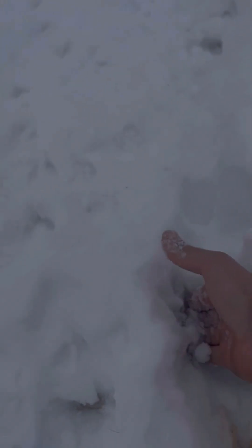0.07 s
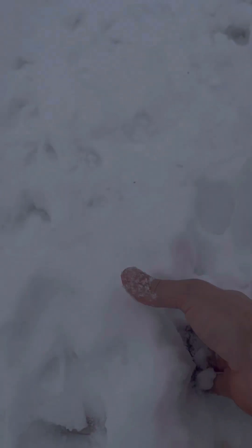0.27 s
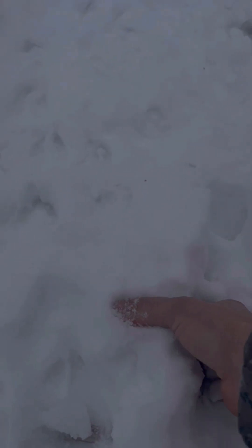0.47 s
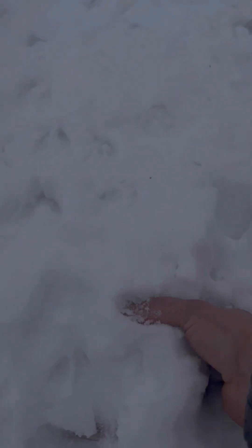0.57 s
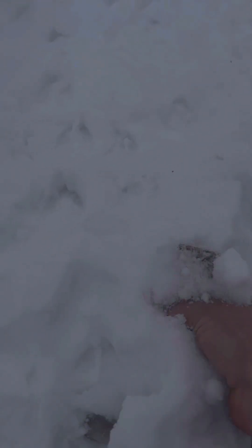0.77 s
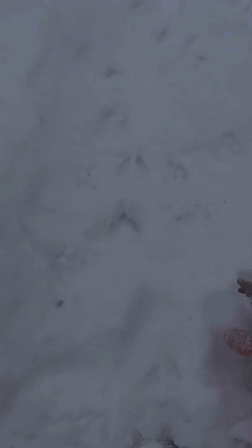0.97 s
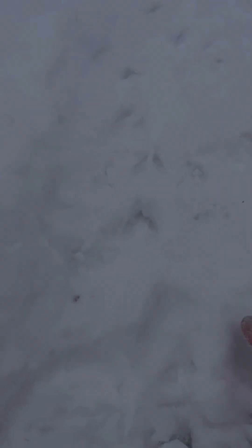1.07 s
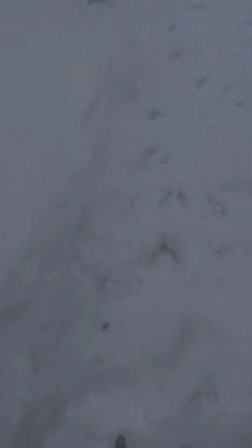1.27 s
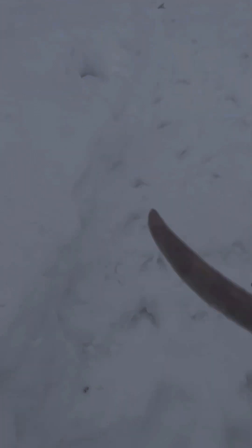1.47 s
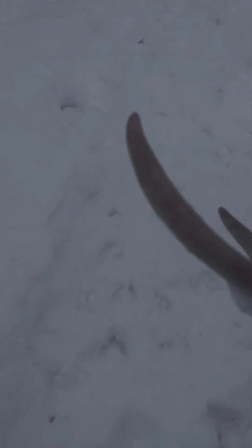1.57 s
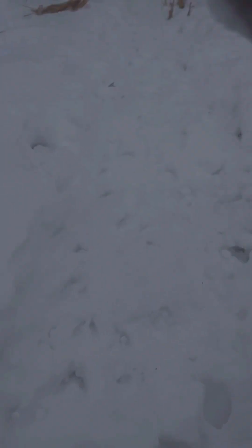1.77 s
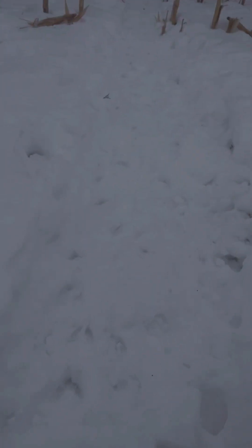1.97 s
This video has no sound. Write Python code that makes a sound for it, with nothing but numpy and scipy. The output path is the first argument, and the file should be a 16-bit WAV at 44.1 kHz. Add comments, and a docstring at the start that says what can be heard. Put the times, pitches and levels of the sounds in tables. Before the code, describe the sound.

A bare hand crunches and scrapes through dry snow, close up, outdoors without echo. Uneven strokes with dull thuds and small crust snaps start immediately, the sharpest crunch coming at about 0.65 seconds. A longer, slightly hollow scrape runs from 1.0 to 1.25 seconds, followed by softer thumps and light scratching that fades by 1.8. At about 1.9 seconds the freed antler gives a brief clicking rattle.

```python
"""Digging an antler out of dry snow

A bare hand digs close to the microphone, in open air with no echo. Brittle fracture of many crystals
makes the crush and scrape of each stroke; packed snow gives way in dull thuds of falling pitch, and
crust snaps. At the end the freed antler chatters, its modes ringing briefly after each contact."""
import sys
import numpy as np
from scipy import signal
from scipy.fft import rfft, irfft, next_fast_len
from scipy.io import wavfile
from scipy.ndimage import map_coordinates

SR = 44100
rng = np.random.default_rng(int(sys.argv[2]) if len(sys.argv) > 2 else 0)


def transcribe(signal):
    """Save signal, clipped to [-1, 1], as a 16-bit WAV file at the path in sys.argv[1]."""
    frames = np.atleast_2d(signal).T
    limited = np.clip(frames, -1, 1)
    pcm = np.round(limited * 32767).astype(np.int16)
    wavfile.write(sys.argv[1], SR, pcm)


N = 89214
T = np.arange(N) / SR


def amp(db):
    return 10 ** (np.asarray(db) / 20)


def unit(x):
    return x / np.sqrt(np.mean(x ** 2) + 1e-20)


def along(points, hz):
    """Interpolation of (frequency, value) points on a logarithmic frequency axis."""
    f, v = np.transpose(points)
    return np.interp(np.log(hz + 1), np.log(f + 1), v)


def curves(rows):
    """Linear interpolation in time: one value per sample for each later column."""
    times, *columns = np.transpose(rows)
    return [np.interp(T, times, column) for column in columns]


def filtered(x, response):
    """Linear filtering: the spectrum of x times a complex frequency response."""
    m = next_fast_len(N + SR // 2)
    return irfft(rfft(x, m) * response(np.fft.rfftfreq(m, 1 / SR)), m)[..., :N]


def shaped(x, points):
    """Spectral shaping by (frequency [Hz], level [dB]) points, to unit rms."""
    return unit(filtered(x, lambda hz: amp(along(points, hz))))


def resonances(modes):
    """Modal superposition: the response of damped resonators of alternating sign."""
    return lambda f: sum((-1) ** k * amp(db) * 1j * f * width / (f0 * f0 - f * f + 1j * f * width)
                         for k, (f0, width, db) in enumerate(modes))


def burst(start, rise, length, t60):
    """Exponential decay after a linear rise and a hold; times in seconds."""
    age = T - start
    return np.clip(age / rise, 0, 1) * amp(-60 * np.clip(age - length, 0, None) / t60)


def clicks(per_s, spread_db):
    """A Poisson process: independent one-sample breaks of random sign and size."""
    chance, sign, size = rng.random(N), rng.standard_normal(N), rng.standard_normal(N)
    return unit(np.sign(sign) * amp(spread_db * np.clip(size, -2, 2)) * (chance < per_s / SR))


def grains(per_s=5000, spread_db=2.5, scrape_share=0.66, clump_db=1.5, clumps_per_s=350):
    """Brittle fracture: two uncorrelated streams of crystals breaking in clumps, over a smooth scrape."""
    breaks = np.array([clicks(per_s, spread_db), clicks(per_s, spread_db)])
    knots = rng.standard_normal(int(N * clumps_per_s / SR) + 4)
    clumps = amp(clump_db * np.clip(map_coordinates(knots, [T * clumps_per_s]), -2, 2))
    scrape = rng.standard_normal((2, N))
    return (np.sqrt(1 - scrape_share) * breaks + np.sqrt(scrape_share) * scrape) * clumps


# Spectrum of the outdoor hush: (frequency [Hz], level [dB])
AIR_SPECTRUM = [(24, -54), (40, -8), (1330, -22.5), (1710, -9), (1990, -17), (9010, -27), (9710, -34),
                (14900, -14), (16500, -33)]
def air(level_db=-62.5):
    """Stationary coloured noise: the faint hush of open air."""
    return amp(level_db) * shaped(rng.standard_normal((2, N)), AIR_SPECTRUM)


def thud(rise, start_hz, end_hz=65, fall_s=0.0079):
    """A damped downward chirp: a soft push whose pitch sinks as it travels through the pack."""
    t = np.arange(SR // 8) / SR
    cycles = end_hz * t + (start_hz - end_hz) * fall_s * (1 - np.exp(-t / fall_s))
    return t / rise * np.exp(1 - t / rise) * np.sin(2 * np.pi * cycles)


# Single collapses: (time [s], peak [dB], rise [s], starting pitch [Hz], after-swing re peak [dB])
THUDS = [(.004, -20.5, 0.0035, 280, -35), (.204, -29, 0.0028, 353, -6.5), (.311, -30, 0.0044, 308, -16),
         (.366, -21, 0.0042, 312, -21), (.523, -19.5, .007, 370, -25), (.6575, -22, 0.0027, 616, -16),
         (.663, -26, 0.0066, 189, -5), (.847, -27.5, 0.0041, 230, -22), (.865, -27, 0.0045, 298, -27),
         (.885, -30, 0.0051, 275, -7), (.903, -35.5, .005, 208, 2), (1.025, -32.5, 0.0031, 328, 1.5),
         (1.107, -35, 0.0065, 222, -7), (1.251, -41.5, .003, 328, -8), (1.274, -33, 0.0038, 294, 6),
         (1.291, -32.5, 0.013, 168, -1), (1.357, -42.5, 0.003, 312, 4), (1.377, -38, 0.0019, 285, -18),
         (1.395, -34.5, 0.0029, 319, -3), (1.451, -42.5, 0.0044, 304, -11), (1.5, -39.5, 0.0036, 320, -4),
         (1.529, -43, 0.0027, 323, -8), (1.557, -42.5, 0.0045, 320, -14), (1.598, -32.5, .005, 313, -6),
         (1.779, -51, 0.0039, 424, 5.5)]
# Settling of the pack: (time [s], rub level [dB], rumble level [dB])
SETTLING = [(0, -34, -29), (.09, -39.5, -39.5), (.135, -39.5, -44), (.15, -53, -60), (.2, -44.5, -56),
            (.215, -41, -58), (.3, -38, -48), (.34, -44, -47), (.45, -40, -39), (.51, -41.5, -44),
            (.56, -46.5, -41), (.63, -49, -49), (.652, -66, -52), (.68, -38.5, -42), (.76, -45.5, -37.5),
            (.8, -47.5, -60), (.85, -41.5, -48), (.91, -45, -38), (.94, -71, -57), (1.01, -66, -53.5),
            (1.05, -48.5, -44), (1.1, -55.5, -59), (1.22, -56.5, -58), (1.27, -57, -49), (1.3, -44, -35),
            (1.4, -45.5, -44.5), (1.45, -60.5, -53.5), (1.58, -57, -61), (1.64, -54, -49), (1.67, -66, -77),
            (1.77, -74, -69), (1.83, -75, -68), (1.92, -86, -76), (1.94, -59, -65), (1.98, -62, -60),
            (2.02, -67, -55)]
# Spectrum of the rumble: (frequency [Hz], level [dB])
RUMBLE_SPECTRUM = [(20, 0), (40, 11), (65, 9), (100, 17), (150, -35)]
def packed_snow(swing_hz=60.2, swing_s=0.014):
    """Yielding under load: thuds with a damped after-swing, over a rub of small thuds and a rumble."""
    thuds, t = np.zeros(N + SR), np.arange(SR // 8) / SR
    swing = (t / swing_s) ** 2 * np.exp(2 - 2 * t / swing_s) * np.sin(2 * np.pi * swing_hz * t)
    for start, db, rise, hz, swing_db in THUDS:
        thuds[round(start * SR):][:len(t)] += amp(db) * (thud(rise, hz) - amp(swing_db) * swing)
    rub = signal.fftconvolve(clicks(per_s=300, spread_db=3), thud(rise=0.0038, start_hz=351))[:N]
    rumble = shaped(rng.standard_normal(N), RUMBLE_SPECTRUM)
    rub_db, rumble_db = curves(SETTLING)
    return thuds[:N] + amp(rub_db) * unit(rub) + amp(rumble_db) * rumble


# Modes of the antler: (frequency [Hz], bandwidth [Hz], level [dB])
ANTLER_MODES = [(1580, 42, -4), (2370, 49, -6), (2876, 61, -5), (4480, 98, -7), (5750, 126, -1),
                (8010, 170, -6)]
# Contacts: (time [s], length [s], level [dB], ringing share [0-1], favoured frequency [Hz])
CONTACTS = [(1.9319, 0.0093, -33, 0.53, 3320), (1.943, 0.0045, -29.5, 0.98, 5700),
            (1.95, .022, -45, 0.44, 2300), (1.958, 0.0057, -42.5, 0.55, 5700),
            (1.976, 0.0065, -47, 0, 4500), (1.98, 0.0059, -36, 0.07, 6000),
            (1.987, 0.0048, -36, 0.13, 6000), (1.992, .005, -36.5, 0.8, 4500),
            (1.9983, 0.028, -39.5, 0.07, 2600)]
# Spectrum of the contact hiss: (frequency [Hz], level [dB])
HISS_SPECTRUM = [(400, -24), (700, -13.5), (3000, -13.5), (6000, -4.5), (8500, -5.5), (10300, -11.5),
                 (14400, -0.5), (15600, -10), (16300, -40)]
def antler(favour_db_per_octave=13.5):
    """Modal excitation: contacts hiss and ring, each spot touched favouring the modes near one pitch."""
    hiss, drive, out = shaped(grains(), HISS_SPECTRUM), grains(), 0
    for start, length, db, share, favoured_hz in CONTACTS:
        modes = resonances([(hz, width, mode_db - favour_db_per_octave * abs(np.log2(hz / favoured_hz)))
                            for hz, width, mode_db in ANTLER_MODES])
        rms_gain = np.sqrt(np.mean(abs(modes(np.linspace(0, SR / 2, 4096))) ** 2))
        envelope = amp(db) * burst(start, rise=0.0014, length=length, t60=0.017)
        ring = filtered(drive * envelope, modes) / rms_gain
        out = out + np.sqrt(share) * ring + np.sqrt(1 - share) * hiss * envelope
    return out


# Breaks in the crust: (time [s], level [dB], 60 dB decay time [s], treble tilt [dB/octave])
SNAPS = [(0.5226, -32.5, 0.046, -2), (0.583, -39.5, 0.027, 1), (0.6548, -25, 0.02, -1.5),
         (1.041, -41.5, 0.022, -3), (1.6048, -42.5, 0.016, 0.5), (1.9116, -50, 0.0066, 2.5)]
# Spectrum of a snap: (frequency [Hz], level [dB])
SNAP_SPECTRUM = [(350, -17), (600, -8), (1800, -3), (4520, -14), (7940, -10.5), (10500, -23.5),
                 (14500, -3.5), (16000, -35)]
def crust():
    """Fracture transients: sudden sprays of grains that die fast, some duller than others."""
    spray, out = shaped(grains(), SNAP_SPECTRUM), 0
    for start, db, t60, tilt_db in SNAPS:
        tilted = filtered(spray, lambda hz: amp(tilt_db * np.log2(hz / 2000 + 0.25)))
        out = out + amp(db) * burst(start, rise=0.00041, length=0.0024, t60=t60) * tilted
    return out


# Hand strokes: (time [s], fizz level [dB], then re fizz: hollow [dB], low crunch [dB], top treble [dB])
STROKES = [(0, -39.5, -7, 4, -3.5), (.036, -39.5, 0.5, -4.5, -7), (.132, -50, 0, 1, -3.5),
           (.146, -67, 1, 0.5, -2), (.236, -53.5, -3.5, -2.5, -8), (.31, -42, -4, -1, -5),
           (.412, -42, 2, -4.5, -1), (.45, -43.5, 0.5, -3, -3), (.484, -50.5, 0, 0, -1),
           (.492, -38, -2, -4, -0.5), (.532, -40, -7, 3, -8), (.548, -47.5, 0.5, 3, -1.5),
           (.6535, -49.5, -2.5, -3.5, -3), (.6555, -26, 2, -21, -3), (.664, -26.5, -5, -10, -3.5),
           (.676, -32.5, -3.5, -1, -3), (.714, -32, -6, -11.5, -4), (.832, -44.5, 1, -7.5, -5.5),
           (.88, -47, -11.5, -10.5, 2.5), (.978, -53, -11.5, -15.5, 0), (1.037, -52.5, -5.5, 3, 1),
           (1.044, -43, 0, -18, -7), (1.106, -37, -4.5, -9.5, -10), (1.145, -36.5, -6.5, -17, -8),
           (1.185, -32.5, -6, -24, -12), (1.238, -32, -4, -25, -12), (1.26, -51, -5, -10.5, -4),
           (1.338, -44.5, -16, -4.5, -1), (1.37, -51.5, -9, -17, -3), (1.404, -52, -15, -16, 0),
           (1.409, -40, -30, -28, -0.5), (1.424, -43, -22, -27, 0), (1.45, -52.5, -12, -16.5, 0.5),
           (1.52, -60.5, -5, -8, 2), (1.654, -57, -7, -8.5, -5.5), (1.685, -57.5, -14, -14, 1),
           (1.693, -47.5, -15, -17, -2), (1.735, -47.5, -18, -32, -5), (1.755, -64.5, -10, -36, -2),
           (1.778, -59.5, -12, -2, 3), (1.794, -49, -17, -19, -11), (1.808, -69, -2, -5, 3),
           (1.908, -60.5, -7, -20, -1), (1.93, -71, -5, -14, -14)]
# Spectra of the three bands of crushing: (frequency [Hz], level [dB])
FIZZ_SPECTRUM = [(1530, -37.5), (2600, -7), (3210, -4), (3910, -2), (4450, -5), (5990, 0), (7980, -2),
                 (10500, -18), (13600, -33), (22000, -120)]
LOW_SPECTRUM = [(300, -11.5), (450, 5), (650, -0.5), (900, -4), (1250, -3), (1700, -34)]
TOP_SPECTRUM = [(6180, -33), (10500, -13), (11800, 0.5), (13700, 1.5), (15000, 0.5), (16000, -8),
                (16500, -45)]
# Modes of the hollow under the hand and of a cavity: (frequency [Hz], bandwidth [Hz], level [dB])
HOLLOW_MODES = [(1772, 720, 41), (2500, 500, -4)]
CAVITY_MODES = [(1706, 400, -3), (2015, 200, -1), (2400, 92, -7)]
# Ring of the cavity that one long stroke opens: (time [s], level re fizz [dB])
CAVITY_RING = [(1.04, -32), (1.06, -5), (1.12, -4), (1.19, -2.5), (1.235, -12), (1.255, -30)]
def hand_strokes():
    """Source and filter: the same crushed grains sound in three bands, a hollow and a cavity."""
    level_db, hollow_db, low_db, top_db = curves(STROKES)
    cavity_db, = curves(CAVITY_RING)
    crush = grains() * (T < STROKES[-1][0])
    fizz = shaped(crush, FIZZ_SPECTRUM)
    top = amp(top_db) * shaped(crush, TOP_SPECTRUM)
    low = amp(low_db) * shaped(crush, LOW_SPECTRUM)
    hollow_ring = filtered(crush, resonances(HOLLOW_MODES))
    hollow = amp(hollow_db) * shaped(hollow_ring, [(900, 7), (1400, -1.5), (2600, 1), (4000, 2)])
    cavity_ring = filtered(crush, lambda hz: resonances(CAVITY_MODES)(hz) ** 2)  # squared: sharper peaks
    cavity = amp(cavity_db) * unit(cavity_ring)
    return amp(level_db) * (fizz + top + hollow + cavity + low)


# Likeness of the two microphone ports: (frequency [Hz], coherence [0-1])
COHERENCE = [(150, 0.72), (300, 0.76), (600, 0.59), (1100, 0.7), (1450, .99), (2400, 1), (2900, 0.59),
             (5000, 0.31), (9000, 0.41), (14000, 0.5)]
# Balance of the ports: (frequency [Hz], left re right [dB])
BALANCE = [(250, -3.5), (600, 2.8), (1200, 2.4), (1500, 0), (2500, 0), (5000, 0.2), (10000, 0)]
# Phase between the ports: (frequency [Hz], lead of the left [rad])
PHASE_LEAD = [(100, 2), (600, 0.58), (1400, 0), (2500, 0), (3200, -.5), (5900, 0), (6600, 0.2),
              (9900, -0.3), (12700, -1.74), (14200, -1), (16200, -5)]
def stereo(pair):
    """Partial coherence: two streams mix as mid and side at two ports, least alike in the treble."""
    angle = lambda hz: np.arccos(along(COHERENCE, hz)) / 2
    mid, side = filtered(pair, lambda hz: np.array([np.cos(angle(hz)), np.sin(angle(hz))]))
    half = np.array([[.5], [-.5]])
    ports = lambda hz: amp(along(BALANCE, hz) * half) * np.exp(1j * along(PHASE_LEAD, hz) * half)
    return filtered(np.array([mid + side, mid - side]), ports)


def scene():
    """Superposition of the sources; the packed snow is the same in both channels."""
    return stereo(hand_strokes() + crust() + antler() + air()) + packed_snow()


def record(dry):
    """Band limiting: the microphone loses the deep bass and keeps nothing above its upper limit."""
    low_hz, top_hz = 47.5, 16400
    return filtered(dry, lambda hz: (1j * hz / (low_hz + 1j * hz)) ** 2 * (hz < top_hz))


dry = scene()
out = record(dry)
transcribe(out)
```